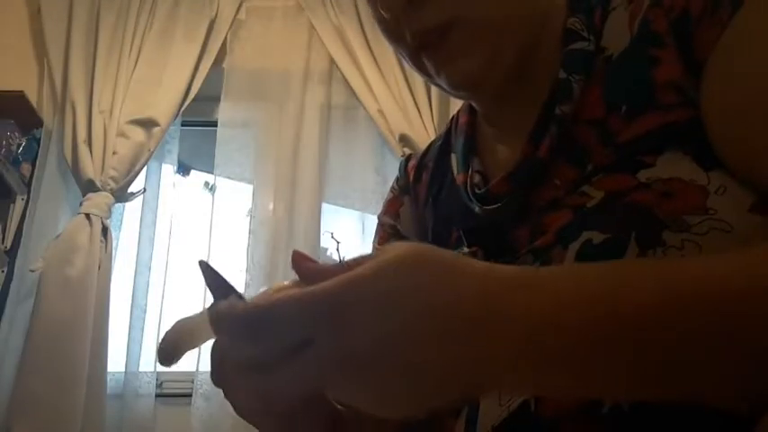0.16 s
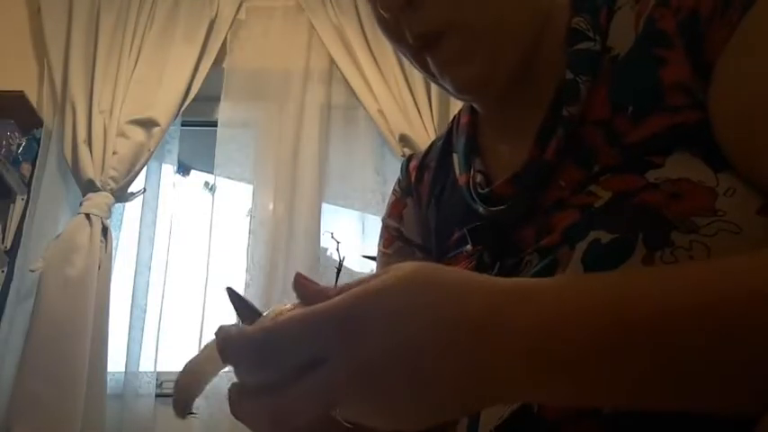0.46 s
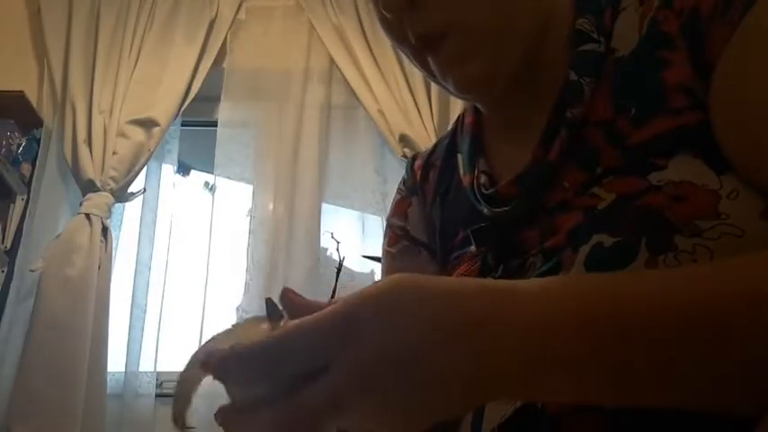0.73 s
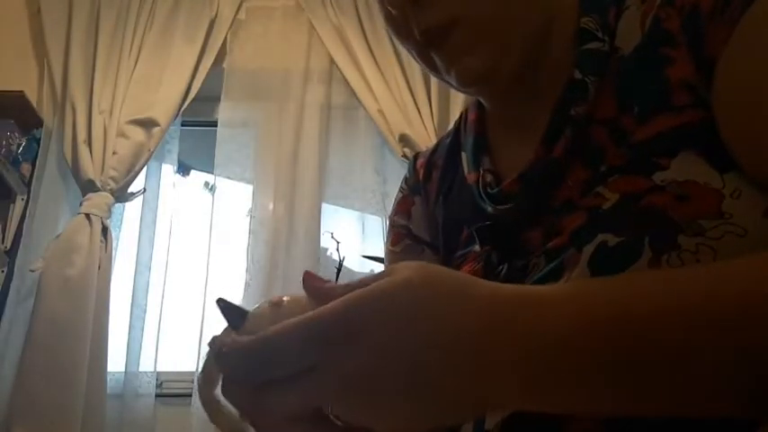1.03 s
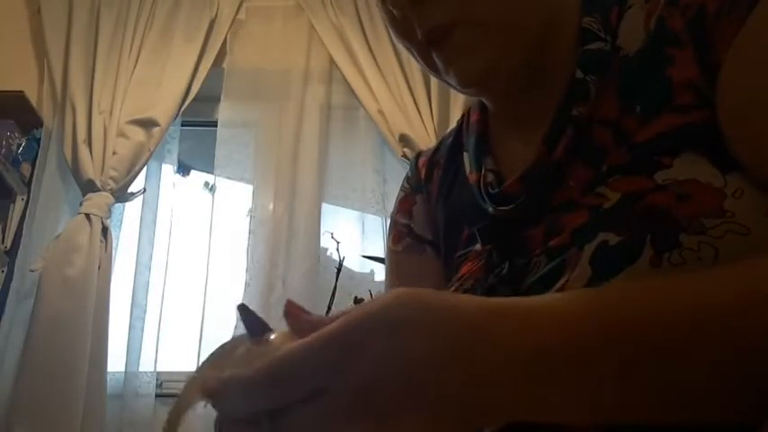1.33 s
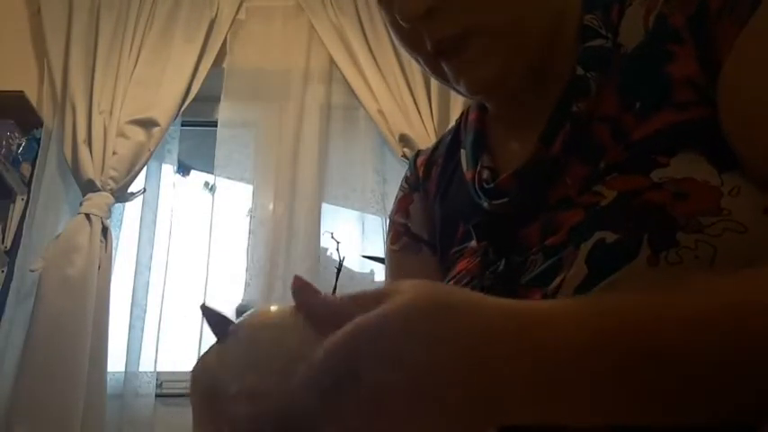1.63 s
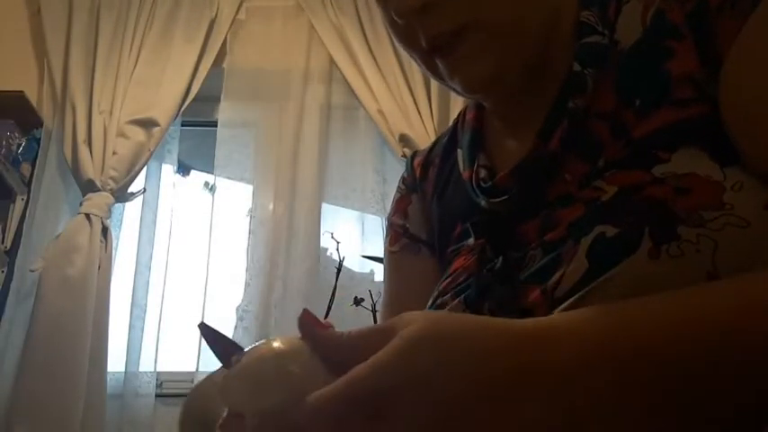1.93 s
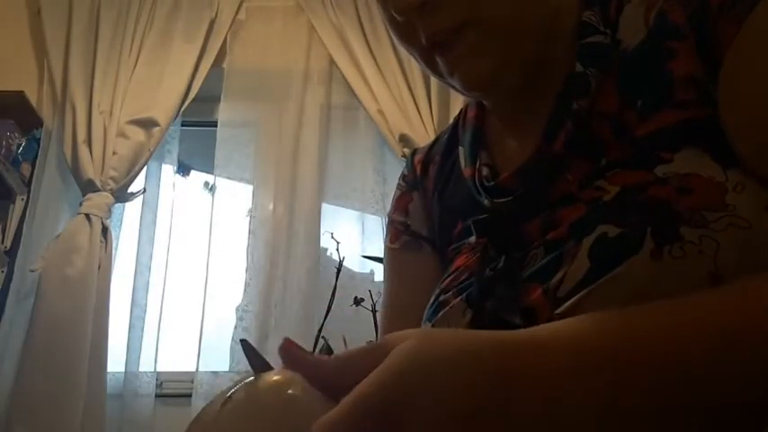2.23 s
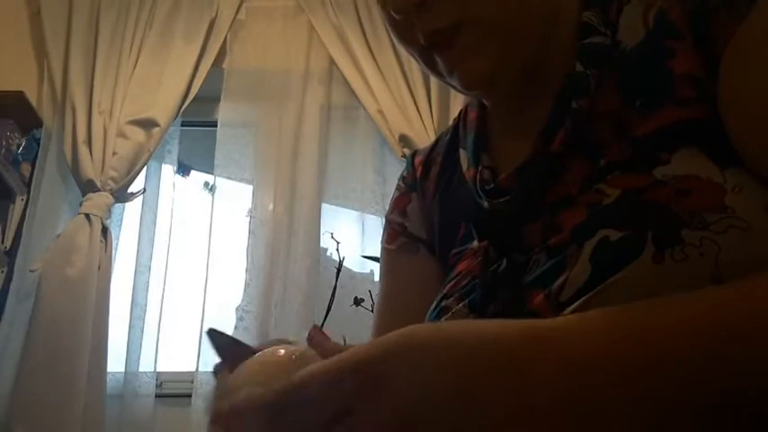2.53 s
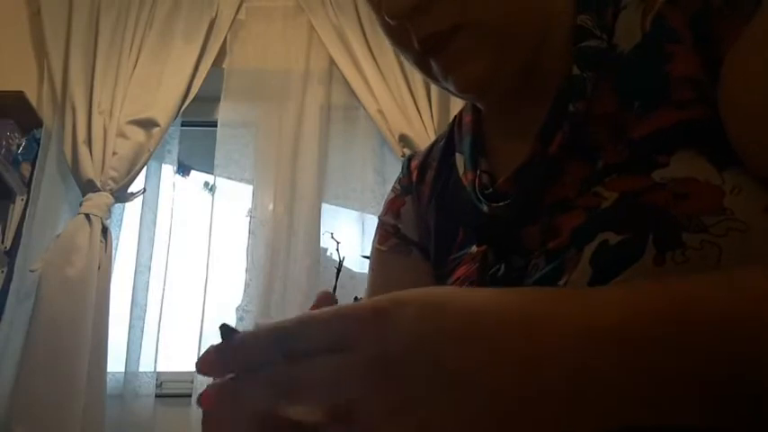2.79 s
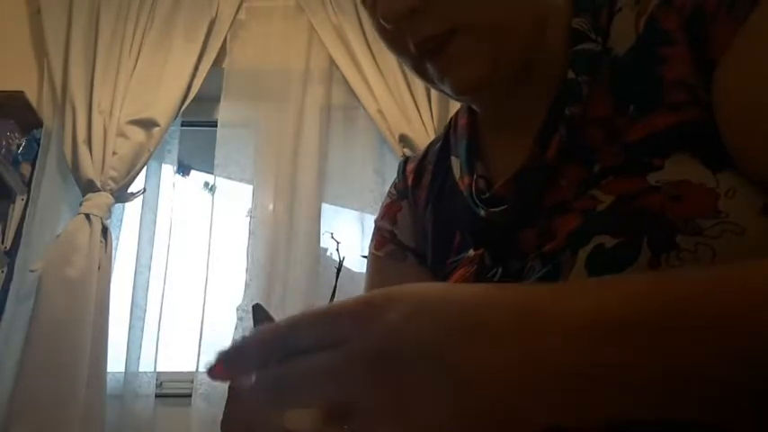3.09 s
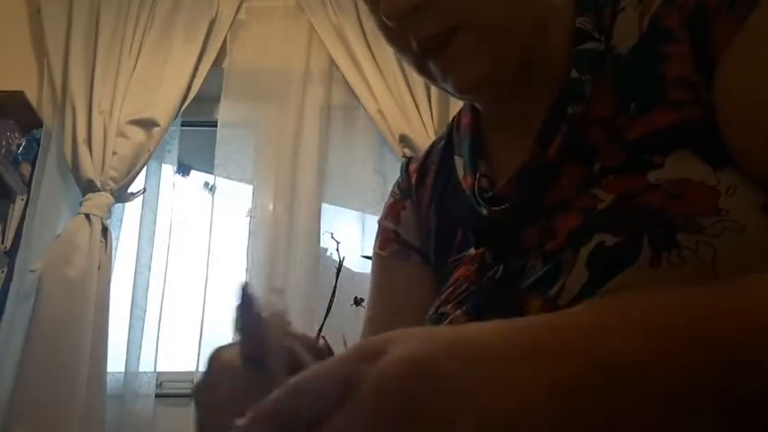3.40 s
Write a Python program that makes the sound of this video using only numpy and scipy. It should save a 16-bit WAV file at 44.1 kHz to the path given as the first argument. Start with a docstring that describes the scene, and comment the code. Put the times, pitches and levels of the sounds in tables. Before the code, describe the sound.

Crisp papery onion skin being peeled by hand, with sharp brittle snaps and short quiet gaps

```python
"""Knife under onion skin

Hands work a small knife under dry onion skin close to a small microphone in a furnished room.
The skin crackles and snaps: clicks and rubbing noise ring short resonances, one for each size of flake.
The microphone port rings near 8.4 kHz and colours every crack. Late on, a knock and a soft weight
ring the counter's modes. The house rumbles low and a thin hiss lies under it, both filtered noise."""
import sys
import numpy as np
from scipy import signal
from scipy.fft import rfft, irfft, next_fast_len
from scipy.io import wavfile
from scipy.ndimage import uniform_filter1d

SR = 44100
rng = np.random.default_rng(int(sys.argv[2]) if len(sys.argv) > 2 else 0)


def generate_wav(signal):
    """Clip the signal to [-1, 1] and save it as 16-bit WAV at the path in sys.argv[1]."""
    frames = np.transpose(np.atleast_2d(signal))
    scaled = np.clip(frames, -1, 1) * 32767
    pcm = np.round(scaled).astype(np.int16)
    wavfile.write(sys.argv[1], SR, pcm)


def linear_from_db(decibels):
    """Turn decibels (scalar or array-like) into linear amplitude factors; 0 gives 1."""
    return 10 ** (np.asarray(decibels, float) / 20)


N = 156555

# Low rumble of the house, relative spectrum: f/Hz, level/dB per Hz
RUMBLE_SPECTRUM = [(15, -71), (25, -20), (59, -13), (72, -10), (92, -3.5), (145, -10.5), (178, -11.5),
                   (266, -10), (398, -17), (540, -18), (720, -31), (961, -38), (1440, -33), (2000, -38),
                   (2600, -71)]
# Room modes where the rumble gathers: f/Hz, width/Hz (first of two passes), level/dB
ROOM_MODES = [(90.7, 5.9, -59), (142.6, 18, -54.5), (264.6, 28.6, -64)]
# Thin hiss, relative spectrum: f/Hz, level/dB per Hz
HISS_SPECTRUM = [(530, -38), (900, -6.5), (5520, -10), (8350, -9.5), (12100, -16), (14000, -51)]
RUMBLE_DB, RUMBLE_DRIFT_DB, RUMBLE_DRIFT_HZ, HISS_DB = -53.5, 1.5, 2.84, -69

# Pull on the skin: t/s, level/dB, depth/dB (lift of the large, low flakes)
PULL = [(0, -58, -7.5), (.29, -45, 0.5), (.31, -39, -3), (.42, -33, 1.5), (.49, -34.5, 4), (.59, -40, 9),
        (.65, -32, 5.5), (.71, -25, 8.5), (.74, -37.5, 12), (.79, -58.5, 5), (.93, -53.5, 3.5),
        (1.1, -43.5, -2), (1.138, -36.5, 15), (1.2, -27, -9.5), (1.246, -22.5, 1), (1.309, -30, -3),
        (1.37, -27.5, 6.5), (1.454, -34, 4.5), (1.5, -62.5, 17), (1.75, -60.5, 2.5), (1.89, -41, 3.5),
        (1.96, -36.5, 2), (2.076, -28.5, 4), (2.16, -39.5, 2), (2.23, -31, -2), (2.3, -55.5, -1),
        (2.345, -40, 3.5), (2.372, -26, 5), (2.43, -53.5, 1), (2.49, -43.5, 6), (2.549, -45.5, 0.5),
        (2.6, -60.5, 3), (2.74, -61.5, -14), (2.86, -62, -3), (2.93, -38.5, 4.5), (2.97, -45.5, 6),
        (3.08, -40, 2), (3.18, -25.5, 0), (3.25, -27.5, -0.5), (3.3, -34.5, 4.5), (3.385, -33.5, 5.5),
        (3.42, -69, 18), (3.55, -78, 15)]
# Balance of the flakes that part: t/s, middle-sized level/dB, finest level/dB
FLAKE_BALANCE = [(.5, -2.5, 1), (2.1, -1.5, 3), (3.12, -5, 0), (3.27, 4, 0.5)]
# Skin and microphone colour, relative spectrum: f/Hz, level/dB per Hz
SKIN_SPECTRUM = [(290, -54), (500, -27.5), (648, -31.5), (1040, -22), (1850, -24.5), (2720, -12),
                 (3480, -15), (3900, -13.5), (4910, -17.5), (7340, -7), (8360, 3), (11300, -18),
                 (13800, -16.5), (14600, -15), (15500, -57)]
RING_CYCLES, SPLIT_HZ = 2.8, 5200   # a flake rings briefly; large flakes sound below the split
FLAKE_DRIFT_HZ = 15.3   # the flakes under the fingers keep changing
CRACKS_PER_S, SIZE_SPREAD_DB = 1200, 3   # typical density, before clumping
CLUMP_DB, CLUMP_DRIFT_HZ = 2.5, 50
CRACKLE_DB, RUB_DB = -4.5, -6.5   # cracks and smooth rubbing, against the pull
RUB_DEPTH_DB = -4   # rubbing stirs the large flakes less
CRACKLE_DRIFT_DB, SNAP_DRIFT_DB = 3.0, 0.85   # colour drift of the flakes

# Snaps: t/s, relative level/dB, relative depth/dB
SNAPS = [(0.034, -28, -17), (0.1444, -22, -50), (0.3109, -8.5, -19.5), (0.3324, -18.5, -9.5),
         (0.3508, -16.5, -12), (0.3713, -16, -12), (0.406, -14.5, -15), (0.4316, -19, -7.5),
         (0.4439, -13, -6.5), (0.5046, -13, -14.5), (0.5276, -13.5, -9.5), (0.5424, -19.5, -5),
         (0.5666, -15.5, -8.5), (0.607, -23, -9), (0.617, -14, -1), (0.6555, -11.5, -12),
         (0.6827, -8.5, -15), (0.702, -15.5, -6.5), (0.838, -36, -27), (0.9397, -24.5, -23),
         (0.9514, -27.5, -18), (1.0214, -25.5, -33), (1.071, -25, -22), (1.1152, -25.5, -9.5),
         (1.1327, -13.5, -12.5), (1.2175, -15, -3.5), (1.2247, -14, -3.5), (1.238, -9, -31),
         (1.2416, -16, -19), (1.253, -18, -19), (1.2766, -24, -32), (1.296, -20, -15), (1.3283, -15.5, -8),
         (1.354, -5, -10.5), (1.558, -30, -28), (1.7619, -26, -28), (1.904, -15, -12), (1.949, -17, -10.5),
         (1.9663, -23, -4.5), (2.0007, -15, -14), (2.0418, -13.5, -8.5), (2.072, -19.5, -9.5),
         (2.1826, -11.5, -13.5), (2.1954, -21, -10), (2.2225, -8.5, -50), (2.2846, -36.5, -0.5),
         (2.3268, -18.5, -17), (2.372, -16.5, -26), (2.4518, -11, -11.5), (2.68, -35.5, -14),
         (2.7501, -15, -28), (2.7528, -3.5, -37), (2.8094, -27, -11.5), (2.8345, -26, -28),
         (2.8742, -26, -27), (3.043, -19.5, -19), (3.0902, -18, -5.5), (3.1053, -12, -14),
         (3.1268, -15, -30), (3.1353, -23, -12), (3.151, -12.5, -39), (3.1678, -12, -24),
         (3.1816, -10.5, -17), (3.195, -11, -18), (3.2355, -2.5, -36), (3.266, -33, 2), (3.3002, -25, 3.5),
         (3.3473, -16.5, -21), (3.384, -26.5, -4)]
SNAP_S, SNAP_GAIN_DB, SNAP_DEPTH_DB = 0.0016, 19.5, 14   # time scale of the trail; added to the table
SNAP_SCATTER_DB = 5   # each crack lies up to this far under full level
BREAK_DB = -5   # each crack of the joint break, against the trailing ones
SETTLE_DB, SETTLE_T60_S = -21.5, 0.079   # the skin goes on crackling after each snap

# A knock, then the soft weight of the onion: t/s, blow level/dB, f/Hz above which the contact is dull
KNOCKS = [(2.751, -32, 2500), (2.7685, -31, 300)]
# Modes of the counter: f/Hz, level/dB, t60/s
COUNTER_MODES = [(150, -5, .08), (740, -12, 0.04), (953, 0, 0.05), (1300, -15, 0.03), (1650, -8, 0.045),
                 (2160, -15, .03)]

ROOM_T60_S, ROOM_DELAY_S, ROOM_DB = 0.2, 0.002, -12
KNOCK_ROOM_DB = -9   # on top of ROOM_DB: the knock travels in the counter, less in the air
UNLIKE_DB, UNLIKE_ABOVE_HZ, UNLIKE_DRIFT_HZ = -29.5, 3700, 422   # channels differ faintly in the treble
OPPOSED_HISS_DB = -85   # hiss of opposite sign in the two channels
LOW_CUT_HZ = 43
# treble weaker than this rising line is lost
TOP_FLOOR_DB, TOP_FROM_HZ, TOP_RISE_DB_PER_KHZ = -98, 11610, 14


def rms_one(x):
    """Scale to unit rms."""
    return x / np.sqrt(np.mean(x ** 2) + 1e-20)


def colour(x, points):
    """Causal (minimum-phase) filter drawn from a spectrum table, by folding its cepstrum."""
    size = next_fast_len(len(x) + 8192)
    size += size % 2
    hz, db = np.transpose(points)
    bins_hz = np.arange(size // 2 + 1) * SR / size
    curve_db = np.interp(np.log(bins_hz + 1), np.log(hz), db)
    cepstrum = irfft(np.log(linear_from_db(curve_db)), size)
    cepstrum[1:size // 2] *= 2
    cepstrum[size // 2 + 1:] = 0
    return irfft(rfft(x, size) * np.exp(rfft(cepstrum)), size)[:len(x)]


def resonance(x, hz, width_hz):
    """Two-pole ringing band, gain 1 on top."""
    r = np.exp(-np.pi * width_hz / SR)
    zeros = np.array([1, 0, -1]) * (1 - r * r) / 2
    poles = [1, -2 * r * np.cos(2 * np.pi * hz / SR), r * r]
    return signal.lfilter(zeros, poles, x + 1e-18)


def drift(rate_hz):
    """Slow random wander, unit rms: noise through two equal low-pass poles, run in for a second."""
    r = np.exp(-2 * np.pi * rate_hz / SR)
    return rms_one(signal.lfilter([1], [1, -2 * r, r * r], rng.standard_normal(N + SR))[SR:])


def background():
    """Low rumble that wanders in level, more of it gathered at the room's modes, and a thin hiss."""
    rumble = rms_one(colour(rng.standard_normal(N + SR), RUMBLE_SPECTRUM)[SR:])
    out = linear_from_db(RUMBLE_DB + RUMBLE_DRIFT_DB * drift(RUMBLE_DRIFT_HZ)) * rumble
    for hz, width_hz, db in ROOM_MODES:
        once = resonance(rng.standard_normal(N + SR), hz, width_hz)
        twice = resonance(once, hz, 2 * width_hz)
        out = out + linear_from_db(db) * rms_one(twice[SR:])
    return out + linear_from_db(HISS_DB) * rms_one(colour(rng.standard_normal(N), HISS_SPECTRUM))


def flakes(clicks, depth_db, dealt, drift_db):
    """Each crack rings the two flakes dealt to it; depth lifts the large, low ones."""
    pitches = np.geomspace(700, 14000, 14)
    # one drift for each group of neighbouring pitches
    changing = [linear_from_db(drift_db * drift(FLAKE_DRIFT_HZ)) for _ in range(5)]
    s, middle_db, finest_db = np.transpose(FLAKE_BALANCE)
    t = np.arange(N) / SR
    large = linear_from_db(depth_db)
    middle = linear_from_db(np.interp(t, s, middle_db))
    finest = linear_from_db(np.interp(t, s, finest_db))
    out = 0
    for k, hz in enumerate(pitches):
        if hz < SPLIT_HZ:
            gain = large
        elif hz < 8000:
            gain = middle
        elif hz > 10000:
            gain = finest
        else:
            gain = 1
        mine = clicks * (dealt == k % 7) * changing[k // 3] * gain
        out = out + resonance(mine, hz, hz / RING_CYCLES)
    return colour(out, SKIN_SPECTRUM)


def crackle():
    """Cracks come in clumps; the pull sets their level, over a smooth rub of fingers on skin."""
    s, pull_db, depth = np.transpose(PULL)
    t = np.arange(N) / SR
    depth_db = np.interp(t, s, depth)
    dealt = rng.integers(0, 7, N)
    clump_db = CLUMP_DB * drift(CLUMP_DRIFT_HZ)
    born = rng.random(N) < CRACKS_PER_S * linear_from_db(clump_db) / SR
    # denser clumps also crack a little louder
    size_db = SIZE_SPREAD_DB * np.minimum(rng.exponential(1, N), 2.5) + 0.5 * clump_db
    clicks = born * linear_from_db(size_db) * rng.choice([-1, 1], N)
    cracks = rms_one(flakes(clicks, depth_db, dealt, CRACKLE_DRIFT_DB))
    rub = rms_one(flakes(rng.standard_normal(N), depth_db + RUB_DEPTH_DB, dealt, CRACKLE_DRIFT_DB))
    level = linear_from_db(np.interp(t, s, pull_db)) + settling()
    return level * (linear_from_db(CRACKLE_DB) * cracks + linear_from_db(RUB_DB) * rub)


def settling():
    """Level of the crackle that each snap sets off, dying away exponentially."""
    kicks = np.zeros(N)
    for s, db, _ in SNAPS:
        kicks[int(s * SR)] = linear_from_db(db + SETTLE_DB)
    return signal.lfilter([1], [1, -linear_from_db(-60 / (SETTLE_T60_S * SR))], kicks)


def snaps():
    """A snap is a run of cracks through flakes of every size; seven break together, seven trail and fade."""
    s, db, depth = np.transpose(SNAPS)
    when, size, sign = rng.random((3, len(s), 14))
    late = -SNAP_S * np.log(1 - 0.9 * when)
    # the joint break: seven successive samples of one sign
    late[:, :7] = np.arange(7)[::-1] / SR
    sign[:, :7] = sign[:, :1]
    fade_db = -5 * late / SNAP_S + BREAK_DB * (np.arange(14) < 7)
    level_db = SNAP_GAIN_DB + db[:, None] + SNAP_SCATTER_DB * (size - 1)
    at = np.minimum(np.round((s[:, None] + late) * SR).astype(int), N - 1)
    clicks, depth_db, dealt = np.zeros((3, N))
    clicks[at] = linear_from_db(fade_db + level_db) * np.sign(sign - 0.5)
    depth_db[at] = depth[:, None] + SNAP_DEPTH_DB
    dealt[at] = np.arange(14) % 7
    return flakes(clicks, depth_db, dealt, SNAP_DRIFT_DB)


def room(x):
    """Dense reflections: noise that decays exponentially after a short delay."""
    t = np.arange(SR // 2) / SR
    tail = rng.standard_normal(len(t)) * linear_from_db(-60 * t / ROOM_T60_S) * (t > ROOM_DELAY_S)
    return linear_from_db(ROOM_DB) * signal.fftconvolve(x, tail / np.sqrt(np.sum(tail ** 2)))[:N]


def knock(s, blow_db, dull_hz):
    """One blow rings the decaying modes of the counter; a soft contact dulls the treble."""
    click = np.zeros(N)
    click[int(s * SR)] = linear_from_db(blow_db)
    out = 0
    for hz, db, t60 in COUNTER_MODES:
        r, w = linear_from_db(-60 / (t60 * SR)), 2 * np.pi * hz / SR
        poles = [1, -2 * r * np.cos(w), r * r]
        out = out + signal.lfilter([0, linear_from_db(db) * np.sin(w)], poles, click + 1e-18)
    return signal.sosfilt(signal.butter(2, dull_hz, fs=SR, output="sos"), out)


def scene():
    """Everything reaches both channels almost alike; a faint difference enters with opposite signs."""
    skin = crackle() + snaps()
    knocks = sum(knock(*blow) for blow in KNOCKS)
    mid = skin + room(skin) + knocks + linear_from_db(KNOCK_ROOM_DB) * room(knocks) + background()
    high_pass = signal.butter(1, UNLIKE_ABOVE_HZ, "high", fs=SR, output="sos")
    unlike = signal.sosfilt(high_pass, mid * drift(UNLIKE_DRIFT_HZ))
    hiss = rms_one(colour(rng.standard_normal(N), HISS_SPECTRUM))
    side = linear_from_db(UNLIKE_DB) * unlike + linear_from_db(OPPOSED_HISS_DB) * hiss
    return mid + side * [[1], [-1]]


def trim_top(x):
    """In each frame the treble ends where the first channel first falls under the rising line."""
    hz, _, frames = signal.stft(x, SR, nperseg=1024)
    power = uniform_filter1d(np.abs(frames[0]) ** 2, size=15, axis=0)
    level_db = 10 * np.log10(power + 1e-20)
    above_hz = hz[:, None] - TOP_FROM_HZ
    line_db = TOP_FLOOR_DB + TOP_RISE_DB_PER_KHZ * above_hz / 1000
    weak = (level_db < line_db) & (above_hz > 0)
    kept = np.cumsum(weak, axis=0) == 0
    return signal.istft(frames * kept, SR, nperseg=1024)[1][:, :N]


def band_limit(x):
    """A steep low-pass at the top of the band."""
    return signal.sosfilt(signal.butter(12, 15760, fs=SR, output="sos"), x)


def record(dry):
    """A low cut, then weak top treble dropped."""
    cut = signal.sosfilt(signal.butter(2, LOW_CUT_HZ, "high", fs=SR, output="sos"), dry)
    mix = trim_top(cut)
    return band_limit(mix)


dry = scene()
out = record(dry)
generate_wav(out)
```